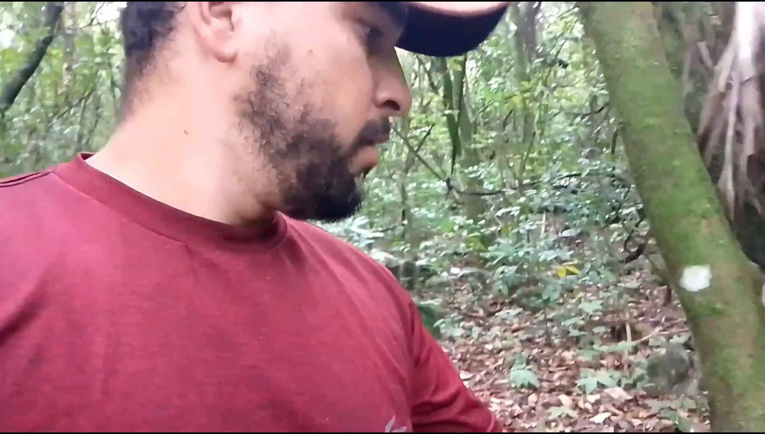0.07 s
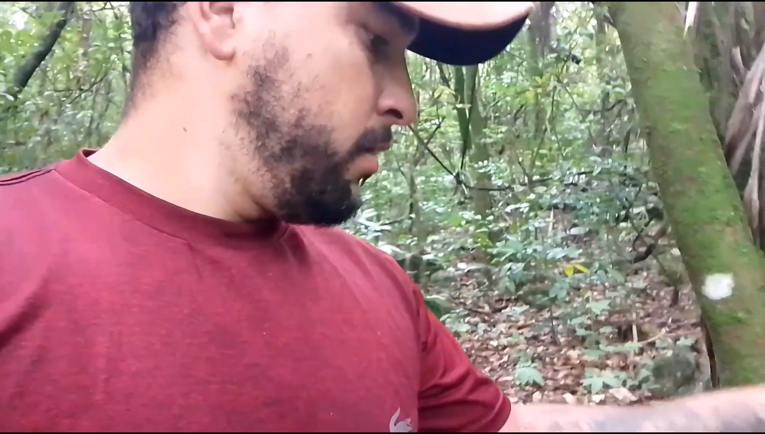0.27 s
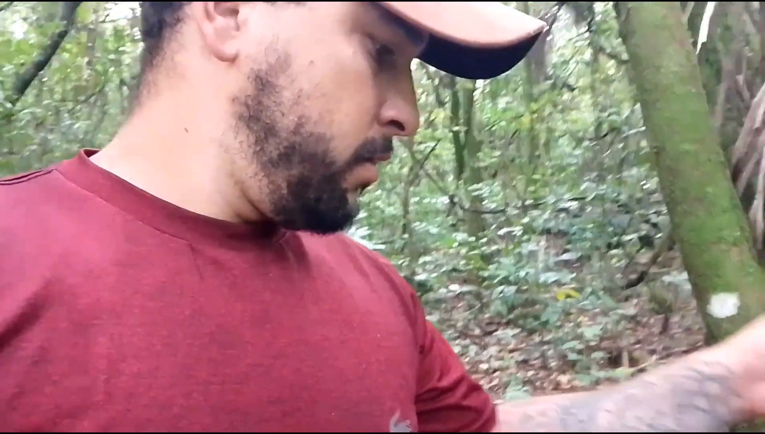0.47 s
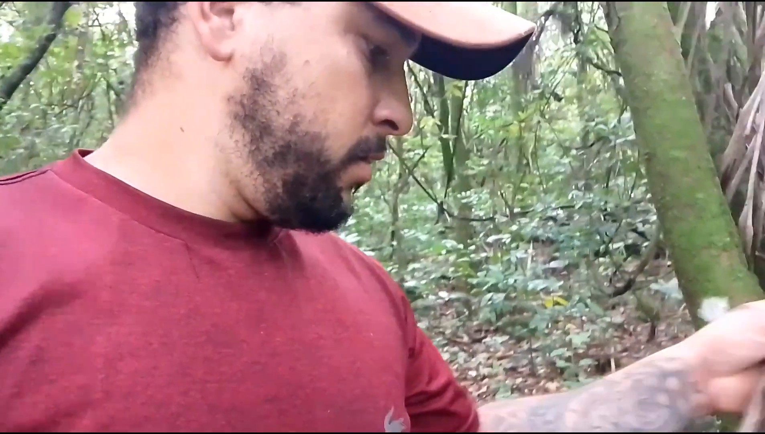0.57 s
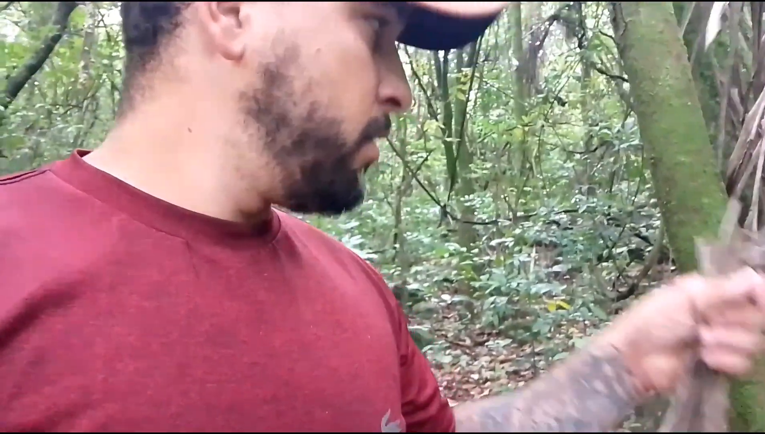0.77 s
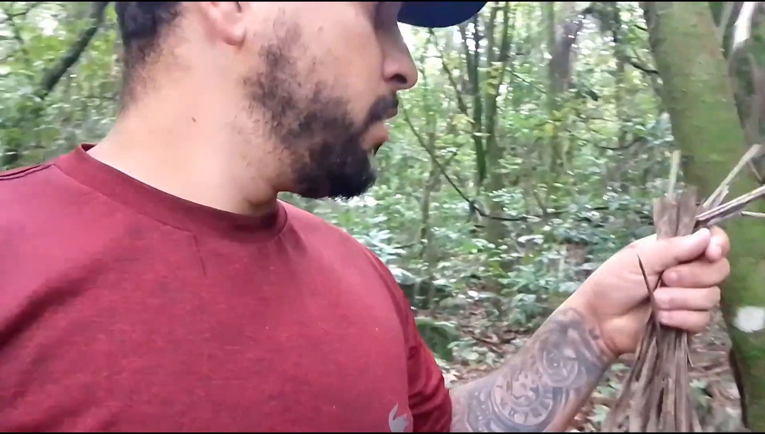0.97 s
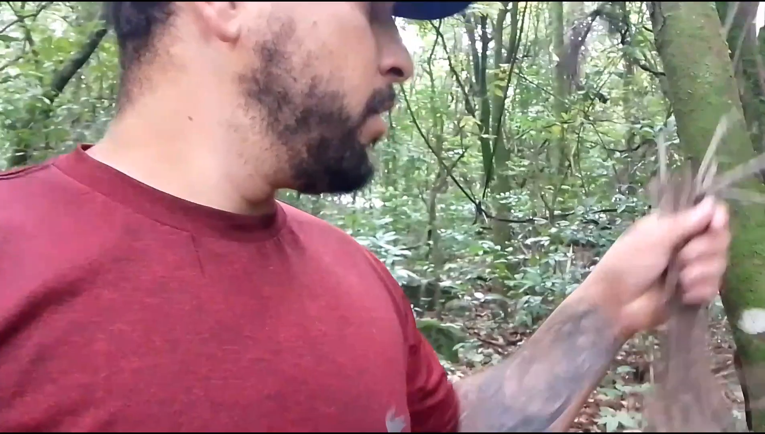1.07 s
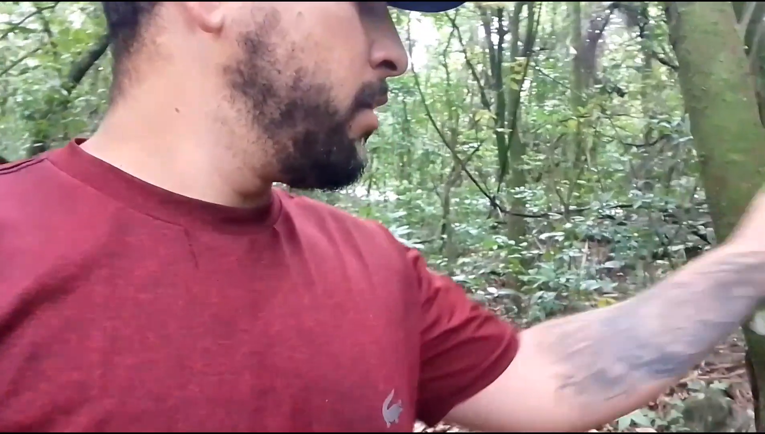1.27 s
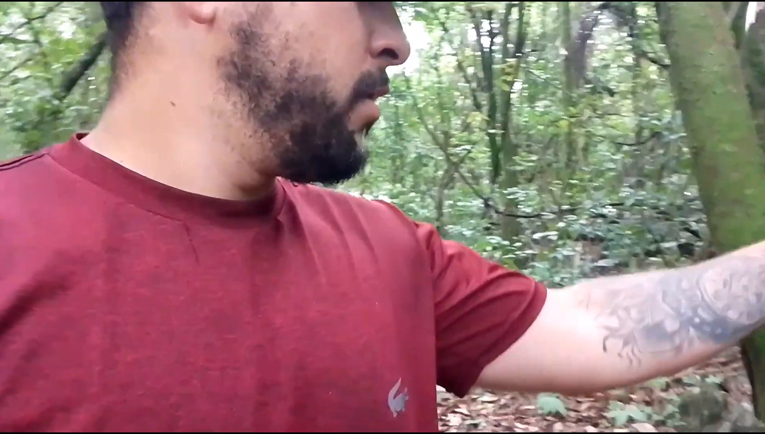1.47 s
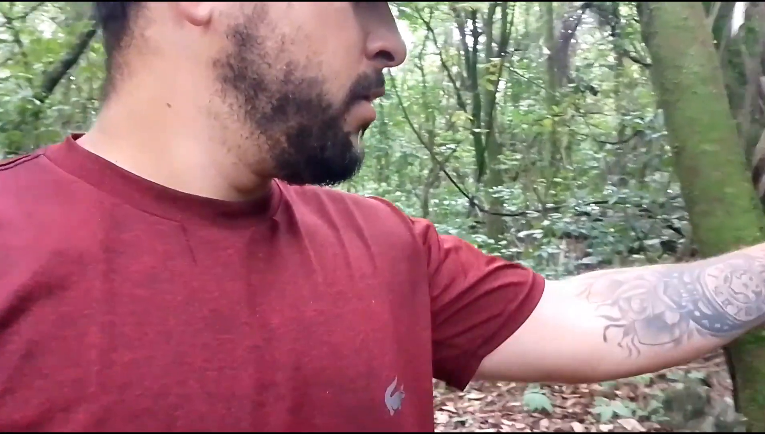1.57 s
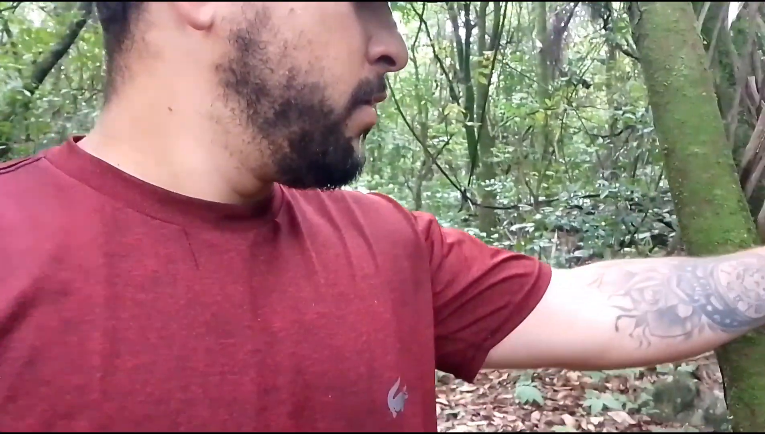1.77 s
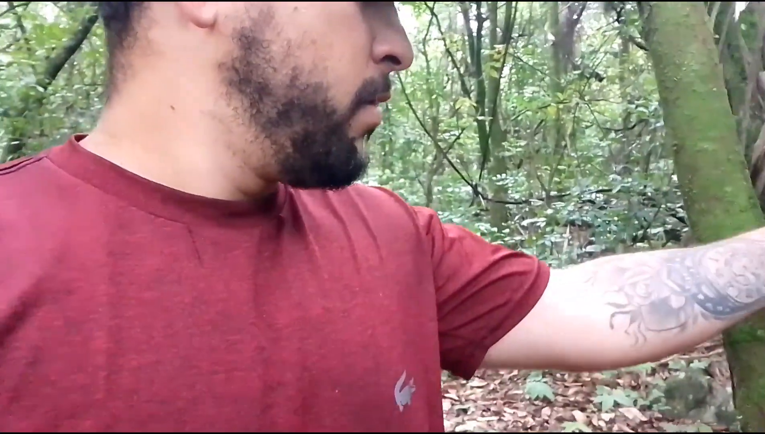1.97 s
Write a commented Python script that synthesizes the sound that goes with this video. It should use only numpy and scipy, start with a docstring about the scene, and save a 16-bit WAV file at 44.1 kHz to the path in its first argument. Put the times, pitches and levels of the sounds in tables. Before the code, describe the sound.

A bundle of dry palm leaves is torn by hand with crisp crackles in quiet forest

```python
"""Dry palm fronds torn by hand

Stiff fibres snap in irregular bursts: short noise bursts in five bands, each with a leaflet rattle.
Under them the blades slide and crinkle: unevenly gripped noise plus dense tiny clicks, coloured and ringing.
The bundle bumps softly against the hand. Near surfaces and trees return faint scattered echoes,
over quiet forest air with a thin insect hiss. The sharpest peaks overload a little."""
import sys
import numpy as np
from scipy import signal
from scipy.io import wavfile

SR = 44100
rng = np.random.default_rng(int(sys.argv[2]) if len(sys.argv) > 2 else 0)


def transcribe(signal):
    """Save signal, clipped to [-1, 1], as a 16-bit WAV file at the path in sys.argv[1]."""
    frames = np.atleast_2d(signal).T
    limited = np.clip(frames, -1, 1)
    pcm = np.round(limited * 32767).astype(np.int16)
    wavfile.write(sys.argv[1], SR, pcm)


N = 90405

SLAP_S = 0.001312  # nominal delay of the quick reflection between the blades


def amp(db):
    """Decibels to gain."""
    return 10 ** (np.asarray(db) / 20)


def unit_rms(x):
    """Scales to an rms of one."""
    return x / np.sqrt(np.mean(x ** 2) + 1e-20)


def unit_energy(x):
    """Scales to an energy of one."""
    return x / np.sqrt(np.sum(x ** 2) + 1e-20)


def add(mix, start_s, sound):
    """Mixes a sound in at start_s, cut at the end of the mix."""
    part = mix[max(round(start_s * SR), 0):][:len(sound)]
    part += sound[:len(part)]


def band(x, edges_hz, order=3):
    """Causal Butterworth band-pass."""
    sos = signal.butter(order, edges_hz, "bandpass", fs=SR, output="sos")
    return signal.sosfilt(sos, x)


def colour(x, points, size=4096):
    """Minimum-phase filter of unit energy; points give the shape of its spectrum."""
    point_hz, point_db = np.transpose(points)
    bin_hz = abs(np.fft.fftfreq(size, 1 / SR))
    gain_db = np.interp(np.log(bin_hz + 1), np.log(point_hz), point_db)
    log_gain = np.log(amp(gain_db))
    spectrum = np.exp(np.conj(signal.hilbert(log_gain)))
    taps = np.fft.ifft(spectrum).real[:size // 2]
    return signal.fftconvolve(x, unit_energy(taps))[:len(x)]


def forest():
    """Faint steady air, with a thin far hiss of insects near 5 kHz."""
    # spectrum shape: freq_hz, relative_db (per Hz)
    air_spectrum = [(25, 5), (60, -14), (100, -14.5), (140, -36), (200, -13.5), (300, -4.5), (500, -2.5),
                    (1000, -5.5), (2000, -1.5), (4400, 3), (5150, 11), (5700, -4.5), (9000, -7.5),
                    (15000, -28.5)]
    level_db = -66.5
    return amp(level_db) * colour(rng.standard_normal(N), air_spectrum)


def echoes(x, t60_s, size=20000):
    """Sparse scattered reflections from 3 ms on, falling 60 dB in t60_s."""
    t = np.arange(size) / SR
    hits = rng.standard_normal(size) * (rng.random(size) < .1)
    taps = hits * (t > .003) * amp(-60 * t / t60_s)
    return signal.fftconvolve(x, unit_energy(taps))[:N]


def bumps(size=4096):
    """The bundled stems knock softly against the hand: dull band noise with a fast fade."""
    # knocks: start_s, level_db, fade_s (time constant)
    knocks = [(0.4211, -52, 0.015), (0.813, -71.5, 0.0085), (1.438, -63.5, 0.0056)]
    # pass band: low_hz, high_hz
    knock_band_hz = (434, 1520)
    out, t = np.zeros(N), np.arange(size) / SR
    for start_s, level_db, fade_s in knocks:
        noise = unit_rms(band(rng.standard_normal(size), knock_band_hz))
        add(out, start_s, amp(level_db) * noise * np.exp(-t / fade_s))
    return out


def crinkle(patches=16, size=256):
    """Tiny buckles of all sizes, each in one of several leaf patches with its own short ring."""
    clicks_per_s, spread_db, fade_s = 1100, 4.5, 0.00039
    out, t = np.zeros(N), np.arange(size) / SR
    for _ in range(patches):
        hits = rng.random(N) < clicks_per_s / patches / SR
        sizes = amp(spread_db * np.minimum(rng.exponential(1, N), 3.5))
        patch_ring = unit_energy(rng.standard_normal(size) * np.exp(-t / fade_s))
        out += signal.fftconvolve(hits * sizes, patch_ring)[:N]
    return unit_rms(out)


def rustle():
    """Blades slide with a grip that catches and lets go, and crinkle as they bend."""
    # rubbing strength, before ring, slap and mix gain: time_s, body_db, treble_db
    rub = [(0, -81, -80), (0.038, -62.5, -56.5), (.11, -53.5, -50.5), (.2, -55, -54), (.26, -45.5, -38),
           (0.318, -37.5, -33), (.36, -42, -33.5), (.44, -48, -35), (.5, -43.5, -43), (0.559, -51.5, -42.5),
           (.62, -50, -44), (0.681, -50.5, -46.5), (0.751, -57, -54.5), (0.809, -51.5, -50),
           (.89, -61.5, -56), (.97, -62, -55.5), (1.02, -52, -47), (1.08, -61, -53), (1.13, -65.5, -59),
           (1.25, -74.5, -66.5), (1.33, -67.5, -61.5), (1.45, -64.5, -60), (1.56, -58.5, -54),
           (1.67, -68.5, -63), (1.75, -62, -60.5), (1.82, -56, -54), (1.879, -50, -45), (1.95, -53, -53.5),
           (2.01, -52, -49), (2.05, -63.5, -63)]
    # body colour: freq_hz, relative_db (per Hz)
    body_spectrum = [(100, -53.5), (400, -26.5), (1000, -15.5), (1500, -12), (2000, -6), (2700, -8.5),
                     (3400, 0), (4300, -1), (5300, -5.5), (7000, -28)]
    # treble colour: freq_hz, relative_db (per Hz)
    treble_spectrum = [(3500, -36.5), (5400, -14.5), (6300, -4), (8700, 1.5), (9600, -3.5), (10800, -8.5),
                       (12600, -10.5), (14000, -14), (16000, -28.5)]
    slide_db, crinkle_db = -3.5, -5
    grip_rms_db, grip_s = 3.3, 0.0029  # depth and time scale of the uneven grip
    t = np.arange(N) / SR
    time_s, body_db, treble_db = np.transpose(rub)
    keep = np.exp(-1 / (grip_s * SR))
    grip = unit_rms(signal.lfilter([1], [1, -keep], rng.standard_normal(N)))
    slide = unit_rms(rng.standard_normal(N) * amp(grip_rms_db * grip))
    drive = amp(slide_db) * slide + amp(crinkle_db) * crinkle()
    body = colour(drive * amp(np.interp(t, time_s, body_db)), body_spectrum)
    treble = colour(drive * amp(np.interp(t, time_s, treble_db)), treble_spectrum)
    return body + treble


def ring(x):
    """Adds the narrow resonances of the dry blades."""
    # resonances: freq_hz, width_hz, gain_db (before the common mix_db)
    resonances = [(2370, 200, -3.5), (2984, 170, 6), (3545, 140, 2), (3930, 91, -3), (6950, 110, 2.5),
                  (7900, 330, -4), (8430, 180, -5), (8920, 180, 1.5), (9800, 55, 2), (12000, 300, 0)]
    mix_db = -3
    rings = np.zeros(N)
    for freq_hz, width_hz, gain_db in resonances:
        b, a = signal.iirpeak(freq_hz, freq_hz / width_hz, fs=SR)
        rings += amp(gain_db) * signal.lfilter(b, a, x)
    return x + amp(mix_db) * rings


def slap(x, count=14):
    """A quick reflection between the blades whose delay drifts as the fronds move."""
    strength = 0.46
    t = np.arange(N) / SR
    drift = np.interp(t, np.linspace(0, t[-1], count), rng.uniform(0.834, 1.151, count))
    return x + strength * np.interp(t - SLAP_S * drift, t, x)


def brighten(x):
    """Lifts or lowers the top treble of the rubbing over time."""
    # top treble against the rest: time_s, gain_db
    top_treble = [(0, 5), (.2, 2.5), (.45, 0), (.7, -3.5), (1.04, 1.5), (1.3, -0.5), (1.6, 1.5), (1.9, -5),
                  (2.05, 0)]
    top_hz = 11320
    sos = signal.butter(3, top_hz, "highpass", fs=SR, output="sos")
    top = signal.sosfiltfilt(sos, x)
    gain_db = np.interp(np.arange(N) / SR, *np.transpose(top_treble))
    return x + (amp(gain_db) - 1) * top


def snap(level_db, thud_db, body_db, sizzle_db, die_ms, size=1024):
    """A fibre breaks in a quick run of tiny fractures, then the leaflets beside it rattle."""
    # rows of the next three: thud, body, hollow, crack, sizzle
    # pass bands: low_hz, high_hz
    edges_hz = [(300, 3600), (1950, 4460), (4400, 7060), (6500, 9230), (9900, 14350)]
    # band trims: gain_db
    trim_db = [3, 1, -2, 0, 2]
    # filter orders: order
    orders = [2, 6, 3, 4, 3]
    open_ms, shortest_ms = 0.069, 0.15  # onset time constant, least decay time constant
    rattle_db, rattle_rise_s, rattle_fade_s = -10, 0.0031, 0.0023
    slap_strength = 0.26
    t = np.arange(size) / SR
    ms = t * 1000
    fracture, shake = rng.standard_normal((2, size))
    envelope = (1 - np.exp(-ms / open_ms)) * np.exp(-ms / max(die_ms, shortest_ms))
    burst = unit_energy(fracture * envelope)
    swell = (1 - np.exp(-(t / rattle_rise_s) ** 2)) * np.exp(-t / rattle_fade_s)
    rattle = amp(rattle_db) * unit_energy(shake * swell)
    delay_s = SLAP_S * rng.uniform(0.1725, 1)
    reflection = slap_strength * np.interp(t - delay_s, t, burst, left=0)
    drive = burst + rattle + reflection
    hollow_db = (body_db + sizzle_db) / 2
    gains = amp(np.array([thud_db, body_db, hollow_db, 0, sizzle_db]) + trim_db)
    sound = np.zeros(size)
    for gain, edges, order in zip(gains, edges_hz, orders):
        sound += gain * unit_energy(band(drive, edges, order))
    # energy of 1 ms at unit rms
    return amp(level_db) * np.sqrt(SR / 1000) * sound


def snaps():
    """All the breaking fibres, each at its own time."""
    # breaks: start_s, crack level_db, then relative to the crack before band trims:
    # thud_db, body_db, sizzle_db; die_ms (decay time constant, floored in snap)
    breaks = [(0.0575, -48, -9.5, -17, 0, 0.64), (0.1155, -37, -23, -8, -6, 3.6),
              (0.1546, -47, -14, -10, 6, 1), (0.1675, -33.5, -42, -1, -7, 0.68),
              (0.1978, -40.5, -18, -2, -4, 1.4), (0.2162, -9, -31.5, -13, -6.5, 0.6),
              (0.2237, -17, -50, -3.5, -6, 2.8), (0.2673, -13.5, -27, -4.5, -9, 1.0),
              (0.2693, -13, -30, -25, -7.5, 2.6), (0.2777, -8, -55, -6.5, -10.5, 1.1),
              (0.2789, -14.5, -32, 2.5, -18, 2.3), (0.2944, -18.5, -30, -6.5, -2, 1.7),
              (0.3049, -18.5, -30, -8, -10, 0.5), (0.3073, -12.5, -31, -14, -4, 1.6),
              (0.3619, -21, -34, -5.5, -4.5, 0.17), (0.3746, -10, -29, -6, -6.5, 1),
              (0.4024, -28, -41, -20, -5, 0.41), (0.4213, -17, -14, -4, -4, 0.58),
              (0.4378, -22, -30, -8.5, -4, 3), (0.4671, -13.5, -49, -10.5, -3, 1.65),
              (0.4762, -21.5, -31, -18, -18, 0.3), (0.4802, -20, -29, -12.5, -21, 0.27),
              (0.497, -28, -22.5, -11, -18, 1.8), (0.514, -25.5, -29, -2.5, -2.5, 2.2),
              (0.52, -22.5, -47, -10.5, -4.5, 1.5), (0.5776, -23.5, -41, -25, -3.5, 0.99),
              (0.58, -27.5, -50, -1, -19, 0.8), (0.638, -36.5, -28, 6, -21, 2.4),
              (0.6444, -29, -48, -4, -4, 1.2), (0.6467, -35.5, -30, 0, -15, 1.7),
              (0.862, -28, -30, -10.5, -17, 2.4), (0.9194, -26, -53, -11, -23, 0.8),
              (0.9262, -37, -52, 0, -17, 4.3), (0.9337, -34.5, -48, -17, -18, 2.9),
              (0.9608, -37, -25, -12, -14, 0.25), (0.9927, -12.5, -45, -9.5, -31, 0.52),
              (1.048, -30.5, -44, -12, -16, 0.59), (1.1823, -44, -20.5, -18, -28, 0.4),
              (1.3075, -49, -29, -0.5, -13.5, 0.65), (1.3567, -37.5, -47, -17, -20, 0.14),
              (1.3797, -58, -33, 10, -9, 0.34), (1.4239, -44, -26, -5, -15, 0.69),
              (1.4795, -46, -21, -6.5, -13, 1.1), (1.7738, -41, -30, -9.5, -17, 0.88),
              (1.833, -40.5, -43, -3.5, -12, 1.1), (1.916, -29.5, -32, -40, -30, 1.1),
              (1.9352, -24.5, -43.5, -3.5, -12.5, 1.5), (1.944, -39, -15, -1, 2, 5.3),
              (1.9591, -33, -42, 0.5, -13, 2.1), (1.999, -38.5, -52, -22, -15, 0.47)]
    out = np.zeros(N)
    for start_s, *settings in breaks:
        add(out, start_s, snap(*settings))
    return out


def scene():
    """Fronds, their reflections and the forest air."""
    rub_db = -2.5
    near_db, near_t60_s = -18, .045  # arm, body and nearest trunk
    tail_db, tail_t60_s = -25.5, 0.43  # trunks and undergrowth
    rubbing = amp(rub_db) * brighten(slap(ring(rustle())))
    fronds = snaps() + bumps() + rubbing
    near = amp(near_db) * echoes(fronds, near_t60_s)
    tail = amp(tail_db) * echoes(fronds, tail_t60_s)
    return (fronds + near + tail + forest())[None]


def record(dry):
    """Soft overload with unequal limits, which gives sharp peaks a low bump; then a low-pass."""
    knee, ceiling_up, ceiling_down = 0.25, 0.654, 0.568
    cut_hz = 16000
    room = np.where(dry > 0, ceiling_up, ceiling_down) - knee
    over = np.maximum(abs(dry) - knee, 0)
    rounded = dry + np.sign(dry) * (room * np.tanh(over / room) - over)
    taps = signal.firwin(255, cut_hz, window=("kaiser", 9), fs=SR)
    return signal.oaconvolve(rounded, taps[None], "same")


dry = scene()
out = record(dry)
transcribe(out)
```